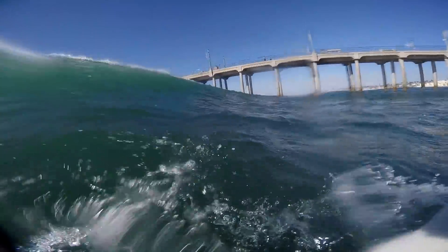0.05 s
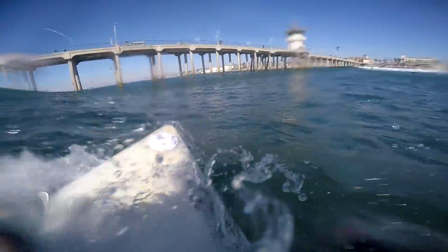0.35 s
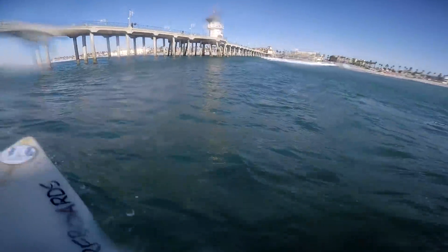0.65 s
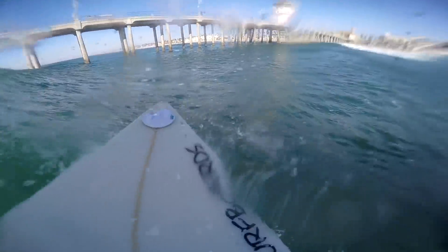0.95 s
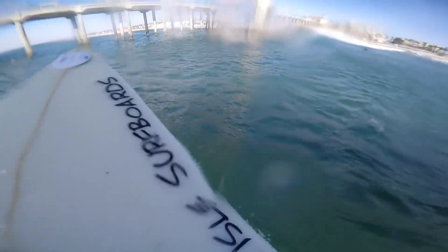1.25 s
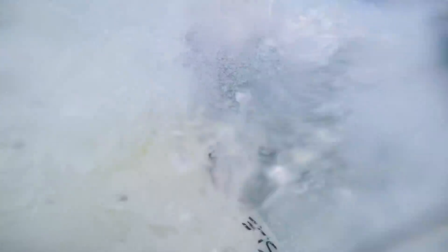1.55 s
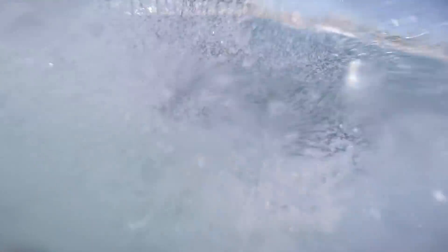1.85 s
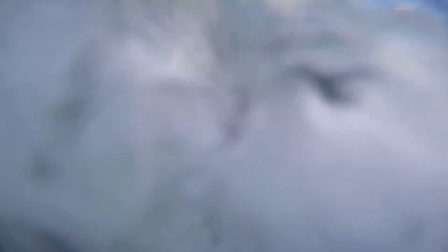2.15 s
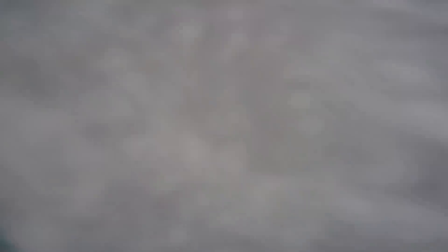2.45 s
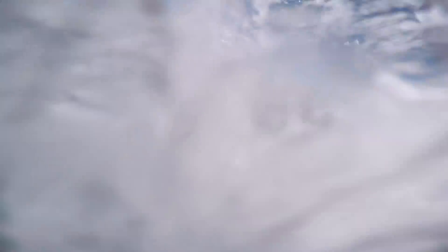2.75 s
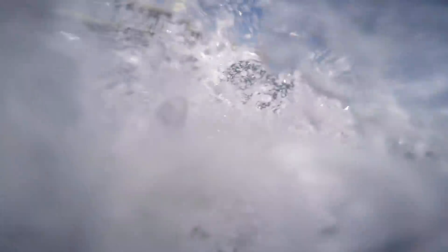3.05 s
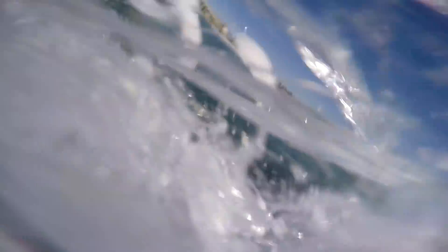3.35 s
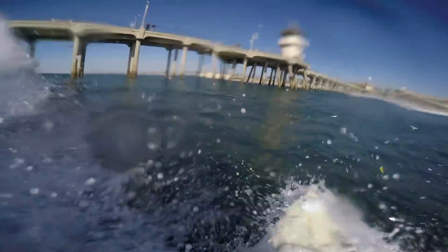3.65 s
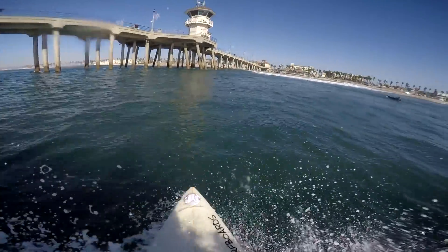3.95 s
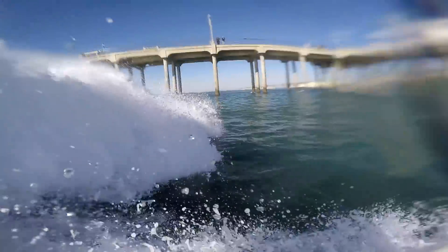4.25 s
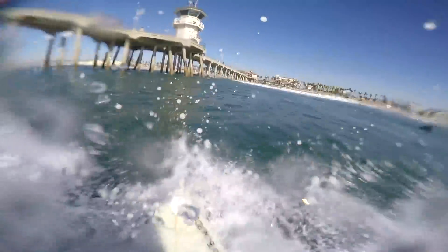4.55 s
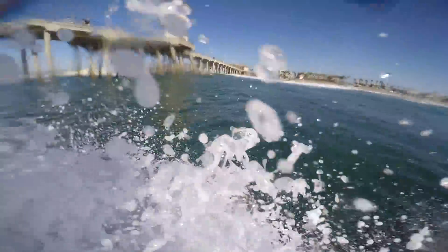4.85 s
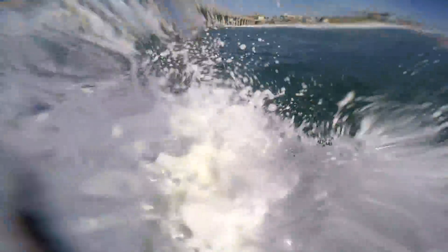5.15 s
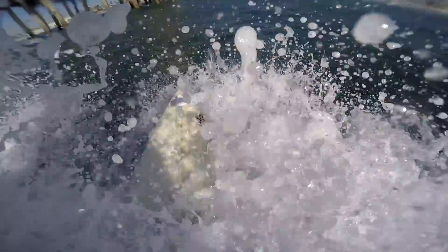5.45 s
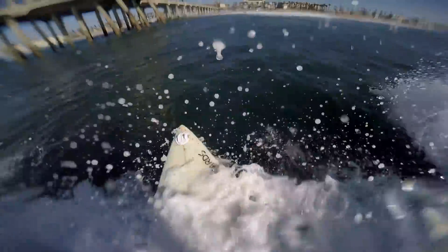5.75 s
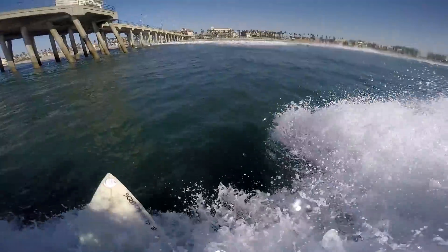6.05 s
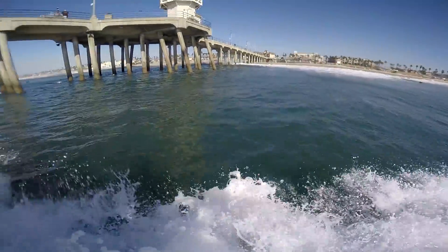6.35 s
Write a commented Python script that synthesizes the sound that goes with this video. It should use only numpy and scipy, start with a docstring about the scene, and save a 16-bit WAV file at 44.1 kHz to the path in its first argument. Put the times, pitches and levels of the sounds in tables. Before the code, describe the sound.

Sea foam seethes around a surfboard while wind rumbles low and drops pop on a waterproof case around the microphone. A wave washes over it in a loud rush of slapping water and thumps. After a brief lull, a second surge brings churning and short gulps of air. More splashes, ticks and dull knocks follow, then thin out to softer foam and wind.

```python
"""A surfer rides through breaking whitewater, heard from a waterproof camera housing.
At first wind rumbles and foam seethes, while drops pop on the case, which rings near 2.3 kHz.
Near 2 s the wave washes over it and sheets of water slap it in the loudest rush of the ride.
From 2.6 to 3.7 s it dips again, deeper; air pockets gulp and the board starts to plane.
Then more drops, slaps and thumps strike the case, thinning out after 5.5 s to foam and wind."""
import sys
import numpy as np
from scipy import signal
from scipy.fft import rfft, irfft
from scipy.io import wavfile
from scipy.ndimage import uniform_filter1d

SR = 44100
rng = np.random.default_rng(int(sys.argv[2]) if len(sys.argv) > 2 else 0)


def store_pcm(level_fs):
    """Save levels as 16-bit WAV."""
    pcm = np.round(np.clip(level_fs, -1, 1) * 32767).astype(np.int16)
    wavfile.write(sys.argv[1], SR, np.atleast_2d(pcm).T)


N = 291060
TIME = np.arange(N) / SR
BAND_LIMIT_HZ = 15550


def amp(db):
    """Amplitude ratio: a factor of ten for every 20 dB."""
    return 10 ** (np.asarray(db) / 20)


def unit(x):
    """Normalisation to an rms of 1."""
    return x / np.sqrt(np.mean(x ** 2) + 1e-20)


def spectrum(points, hz):
    """Spectral envelope in dB, interpolated over log frequency."""
    point_hz, db = np.transpose(points)
    return np.interp(np.log(hz + 1), np.log(point_hz), db)


def colour(x, points):
    """Minimum-phase filtering with the given spectral envelope, scaled to unit energy."""
    log_gain = np.log(amp(spectrum(points, abs(np.fft.fftfreq(4096, 1 / SR)))))
    response = np.exp(np.conj(signal.hilbert(log_gain)))
    taps = np.fft.ifft(response).real[:2048]
    return signal.oaconvolve(x, taps / np.linalg.norm(taps))[:N]


def add(mix, start_s, sound):
    """Superposition: a sound joins the mix at start_s."""
    part = mix[max(round(start_s * SR), 0):][:len(sound)]
    part += sound[:len(part)]


def wander(cutoff_hz):
    """Random modulation: low-passed noise of rms 1."""
    hz = np.fft.rfftfreq(N, 1 / SR)
    return unit(irfft(rfft(rng.standard_normal(N)) / (1 + (hz / cutoff_hz) ** 4), N))


def bubble(hz, swell_s):
    """Bubble resonance: trapped air acts as a spring; its swing swells, then dies away."""
    t = np.arange(SR // 60) / SR
    envelope = (t / swell_s * np.exp(1 - t / swell_s)) ** 2
    return envelope * np.sin(2 * np.pi * hz * t)


def impacts(per_s, spread_db):
    """Shot noise: independent impulses of either sign, many small and a few large."""
    pulses = np.zeros(N)
    at = np.flatnonzero(rng.random(N) < per_s / SR)
    size = np.minimum(rng.standard_exponential(N)[at], 4.5)
    pulses[at] = amp(spread_db * size) * np.sign(rng.random(N)[at] - .5)
    return pulses


def seethe(per_s, spread_db, swell_cycles, sizes=18):
    """Incoherent summation: tiny bubbles of many sizes add up to an even spectrum."""
    pulses = impacts(per_s, spread_db)
    size_class = rng.integers(0, sizes, N)
    cloud = np.zeros(N)
    for k, hz in enumerate(np.geomspace(900, 14500, sizes)):
        ring = bubble(hz, swell_cycles / hz)
        ring = ring / np.linalg.norm(ring) * np.sqrt(hz)
        cloud += signal.oaconvolve(pulses * (size_class == k), ring)[:N]
    return unit(cloud)


# Spectrum of the eddies: frequency_hz, gain_db
EDDY_SPECTRUM = [(6, -22.5), (14, -1), (20, -2), (30, -10), (50, -22), (80, -27.5), (130, -50), (300, -76)]
# Airflow over the housing, weaker while the wave shelters it: time_s, level_db
WIND_LEVELS = [(0, -22), (.3, -22), (1.38, -20.5), (1.51, -37), (1.88, -31.5), (2.12, -20), (2.41, -25),
               (2.55, -32.5), (2.88, -34), (2.95, -28), (3.3, -28), (3.6, -27), (5.45, -22), (5.75, -25),
               (6.6, -25)]


def wind(gain_db=-1, evenness=0.37, cutoff_hz=75, gust_db=2.5, gust_hz=6):
    """Vortex shedding: eddies leave the housing in quick gusts, a very low rumble."""
    hz = np.fft.rfftfreq(N, 1 / SR)
    response = amp(spectrum(EDDY_SPECTRUM, hz)) / (1 + (hz / cutoff_hz) ** 4)
    eddies = unit(irfft(rfft(rng.standard_normal(N)) * response, N))
    envelope = uniform_filter1d(abs(signal.hilbert(eddies)), size=2600)
    flow_db = np.interp(TIME, *np.transpose(WIND_LEVELS))
    return unit(eddies / envelope ** evenness) * amp(flow_db + gain_db + gust_db * wander(gust_hz))


# Strength of the whitewater: time_s, level_db
RUSH_LEVELS = [(0, -45), (.25, -48.5), (.9, -46.5), (1.48, -41.5), (1.75, -47), (1.91, -43), (2.07, -31.5),
               (2.2, -36.5), (2.37, -29.5), (2.65, -53), (2.82, -47.5), (3.0, -37.5), (3.12, -42),
               (3.28, -34.5), (3.57, -37.5), (3.7, -49.5), (3.98, -50.5), (4.25, -43.5), (4.55, -43.5),
               (4.85, -37.5), (5.1, -42.5), (5.48, -40.5), (5.7, -50), (6.6, -45)]


def rush_db():
    """Common modulation: churn, foam, spray and spatter all follow this one level."""
    return np.interp(TIME, *np.transpose(RUSH_LEVELS))


def planing(start_s=3.03, ramp_s=0.17):
    """Hydrodynamic lift: 0 while the board is slow, 1 once it planes and throws more water."""
    return np.clip((TIME - start_s) / ramp_s, 0, 1)


# Dips into the wave: start_s, end_s, immersion_fraction
WAVE_DIPS = [(1.866, 2.158, 0.51), (2.576, 3.677, 0.637)]


def immersion(awash=0.2, ramp_s=0.15):
    """Immersion from 0 (air) to 1 (water): the housing is always awash, and deeper in each dip."""
    depth = np.full(N, awash)
    for start_s, end_s, fraction in WAVE_DIPS:
        inside_s = np.minimum(TIME - start_s, end_s - TIME)
        depth += (fraction - awash) * np.clip(.5 + inside_s / ramp_s, 0, 1)
    return depth


# Spectrum of water pressing on the housing: frequency_hz, gain_db
CHURN_SPECTRUM = [(50, -7.5), (100, 3), (150, 0), (220, -3), (380, -6), (600, -12), (900, -20), (1600, -58)]


def churn(gain_db=-11, planing_db=4.5, lumpy_db=2.0):
    """Turbulent pressure fluctuation: water pushes on the housing in dull lumps."""
    pressure = rng.standard_normal(N) * amp(lumpy_db * wander(84))
    return unit(colour(pressure, CHURN_SPECTRUM)) * amp(rush_db() + gain_db + planing_db * planing())


# Low thumps on the case; the one at 1.35 s has a higher, overloaded edge: centre_s, peak_db, pitch_hz
CASE_THUMPS = [(1.351, -6.5, 42), (1.35, -24.5, 149), (2.387, -10, 62), (2.404, -14.5, 40),
               (2.949, -22.5, 35.7), (3.41, -13.5, 60), (3.44, -17, 50), (3.579, -14, 42.5),
               (4.167, -15, 34), (4.772, -21.5, 75), (4.926, -12, 101), (5.016, -16, 26.5),
               (5.402, -15.5, 45)]


def thumps(width_cycles=0.42):
    """Pressure transient: one short, low swing under a Gaussian envelope is heard as a thump."""
    pressure = np.zeros(N)
    t = np.arange(-SR // 10, SR // 10) / SR
    for centre_s, peak_db, hz in CASE_THUMPS:
        envelope = amp(peak_db) * np.exp(-.5 * (t * hz / width_cycles) ** 2)
        add(pressure, centre_s + t[0], -envelope * np.cos(2 * np.pi * hz * t))
    return pressure


# Gulping pockets of air: start_s, end_s, level_db, start_hz, middle_hz, end_hz
AIR_POCKETS = [(3.175, 3.255, -41, 206, 225, 49), (3.255, 3.36, -44.5, 177, 205, 100),
               (3.2, 3.255, -47, 383, 410, 500)]


def gulps(roughness=0.21):
    """Cavity resonance: a large air pocket hums at a pitch that bends as its neck opens and closes."""
    hums = np.zeros(N)
    for start_s, end_s, level_db, *bend_hz in AIR_POCKETS:
        progress = np.linspace(0, 1, round((end_s - start_s) * SR))
        hz = np.polyval(np.polyfit([0, .4, 1], bend_hz, 2), progress)
        tone = np.sin(2 * np.pi * np.cumsum(hz) / SR)
        add(hums, start_s, amp(level_db) * unit(np.sin(np.pi * progress) * tone))
    return hums * (1 + roughness * wander(82))


# Bands of hiss from jets and slaps: start_s, end_s, level_db, centre_hz, width_hz
HISS_BANDS = [(-.05, 0.194, -52.5, 5560, 900), (-.05, 0.2, -49.5, 1500, 540),
              (2.369, 2.409, -22.5, 2140, 1990), (2.455, 2.506, -26.5, 2420, 1630),
              (2.546, 2.587, -32, 2290, 1590), (3.245, 3.343, -36, 5370, 1700),
              (3.25, 3.32, -37, 2880, 600), (3.393, 3.42, -24, 2680, 2200), (4.114, 4.146, -38, 1100, 800),
              (4.118, 4.149, -37.5, 2030, 810)]


def hiss_bands(taper=0.46):
    """Band-limited noise: narrow bands are sizzling jets, broad ones dull slaps of water on the case."""
    hiss = np.zeros(N)
    for start_s, end_s, level_db, centre_hz, width_hz in HISS_BANDS:
        size = round((end_s - max(start_s, 0)) * SR)
        detuning = (np.fft.rfftfreq(size, 1 / SR) - centre_hz) / (width_hz / 2)
        band = irfft(rfft(rng.standard_normal(size)) / (1 + detuning ** 2), size)
        fade = signal.windows.tukey(round((end_s - start_s) * SR), taper)[-size:]
        add(hiss, start_s, amp(level_db) * unit(band) * fade)
    return hiss


def foam_clumps(hiss, spread_db=1.5):
    """Band-wise modulation: clumps of foam come and go, so each pitch region swells on its own."""
    bands = signal.stft(hiss, nperseg=512)[2]
    clumps = uniform_filter1d(rng.standard_normal(bands.shape), size=5, axis=0)  # across frequency
    clumps = uniform_filter1d(clumps, size=7, axis=1)  # across time
    return signal.istft(bands * amp(spread_db * unit(clumps)), nperseg=512)[1][:N]


# Spectra of the foam and of the brighter spray: frequency_hz, gain_db
FOAM_SPECTRUM = [(350, -11.5), (600, -9), (770, -14.5), (946, -14.5), (1120, -9.5), (1210, -5), (1560, -4),
                 (1680, -2), (2230, 2), (2950, -0.5), (3400, -9), (4040, -8.5), (4500, -10), (5590, -20.5),
                 (8000, -36), (10400, -37), (17600, -120)]
SPRAY_SPECTRUM = [(2800, -10), (3800, -7.5), (5000, -0.5), (5900, -4), (6800, -4.5), (8500, -12),
                  (11000, -14.5), (13000, -14.5), (15200, -22), (15800, -31)]


def whitewater(spray_db=-9.0, planing_db=1.5, immersed_db=-0.5, surge_db=1.5):
    """Bubble noise: in air countless far bubbles merge to a hiss; under water near ones stand apart."""
    depth = immersion()
    far, near = np.sqrt(1 - depth), np.sqrt(depth)  # equal-power crossfade
    flutter_db = (0.8 + 2 * depth) * wander(41)
    foam = far * rng.standard_normal(N) + near * seethe(per_s=1500, spread_db=4.0, swell_cycles=1.8)
    spray = far * rng.standard_normal(N) + near * seethe(per_s=1400, spread_db=4.6, swell_cycles=1.8)
    spray_gain = amp(spray_db + planing_db * planing() + immersed_db * depth)
    hiss = unit(colour(foam, FOAM_SPECTRUM)) + spray_gain * unit(colour(spray, SPRAY_SPECTRUM))
    return foam_clumps(hiss) * amp(rush_db() + flutter_db + surge_db * wander(6))


# Spectrum of fine droplets and mist: frequency_hz, gain_db
MIST_SPECTRUM = [(600, -43), (1400, -19), (2500, -2), (5000, 4), (8000, -5), (11000, -8), (15000, -12),
                 (16500, -18)]


def spatter(tick_db=-20, pop_db=-15):
    """Impact noise: droplets tick and pop on the case, louder as it dips into the spray."""
    ticks = unit(colour(impacts(per_s=140, spread_db=7.5), MIST_SPECTRUM))
    pops = unit(colour(seethe(per_s=130, spread_db=2.1, swell_cycles=1.3), MIST_SPECTRUM))
    wetness = np.clip(2 * immersion(), .25, 1)
    return wetness * amp(rush_db()) * (amp(tick_db) * ticks + amp(pop_db) * pops)


# Response of the case to a splash: frequency_hz, gain_db
CASE_SPECTRUM = [(200, -4), (800, -10.5), (1300, -2.5), (1900, 2), (2600, 5), (3200, -4), (4000, 0.5),
                 (5200, -5.5), (6800, -7), (8500, -14), (11500, -17.5), (15000, -18), (16500, -66)]
# Sheets of water hitting the case: start_s, length_s, splash_db, churn_db
WATER_SHEETS = [(0.436, 0.0069, -33, -53), (1.325, 0.025, -41.5, -51), (1.476, 0.0037, -28.5, -63),
                (1.692, 0.0034, -33, -55), (1.959, 0.016, -29, -63), (2.027, 0.0099, -28.5, -30.5),
                (2.071, 0.013, -39, -34), (2.163, 0.016, -34.5, -35), (2.299, 0.024, -23, -36.5),
                (2.334, 0.028, -27, -51), (2.36, 0.033, -24, -25.5), (2.45, 0.028, -29.5, -36.5),
                (2.552, 0.055, -38.5, -52), (3.173, 0.014, -31.5, -34.5), (3.222, 0.006, -27, -30),
                (3.393, 0.014, -25.5, -22.5), (3.421, 0.025, -24.5, -29.5), (3.54, 0.012, -37.5, -36),
                (4.694, 0.0021, -22, -27.5), (4.717, 0.0022, -30, -26), (4.772, .01, -30, -37),
                (4.881, 0.0072, -31.5, -39), (4.916, 0.0089, -33, -27.5), (5.38, 0.0023, -22.5, -35),
                (5.479, 0.013, -32, -49)]


def slaps(rise_s=0.0011, fall_s=0.0046, ragged_db=2.5, hiss_db=-3):
    """Air entrainment: a sheet of water lands at once, tears into bubbles and drains off."""
    splash_envelope, push_envelope = np.zeros(N), np.zeros(N)
    t = np.arange(SR // 5) / SR
    for start_s, length_s, splash_db, churn_db in WATER_SHEETS:
        shape = (1 - np.exp(-t / rise_s)) * np.exp(-np.maximum(t - length_s, 0) / fall_s)
        add(splash_envelope, start_s, amp(splash_db) * shape)
        add(push_envelope, start_s, amp(churn_db) * shape)
    ragged = unit(amp(ragged_db * wander(190)))
    bubbles = seethe(per_s=5000, spread_db=4.9, swell_cycles=1.88)
    tearing = unit(bubbles + amp(hiss_db) * rng.standard_normal(N))
    splash = colour(tearing * splash_envelope * ragged, CASE_SPECTRUM)
    push = colour(rng.standard_normal(N) * push_envelope * ragged, CHURN_SPECTRUM)
    return splash + push


# Resonances of the housing: pitch_hz, level_db, t60_s
HOUSING_MODES = [(1836, -21.5, 0.0052), (2290, -39, 0.058), (2760, -56, 0.02), (3820, -28.5, 0.021)]


def housing_ring(excitation, gain_db=-12):
    """Modal resonance: the struck case rings on briefly as a sum of damped sinusoids."""
    t = np.arange(SR // 20) / SR
    ring = sum(amp(db - 60 * t / t60_s) * np.sin(2 * np.pi * hz * t) for hz, db, t60_s in HOUSING_MODES)
    return amp(gain_db) * signal.oaconvolve(excitation, ring)[:N]


def stray_drops(immersed_per_s=52, base_db=-29, spread_db=2.2, low_hz=2200, high_hz=8000, count=400):
    """Random arrivals: rows of lesser drops, harder in a loud rush and more frequent with depth."""
    when, chance, pitch = rng.random((count, 3)).T
    at = (when * N).astype(int)
    excess_db = rush_db()[at] + 44  # above a middling rush
    level_db = base_db + 0.49 * excess_db + spread_db * rng.standard_normal(count)
    pitch_hz = low_hz * (high_hz / low_hz) ** pitch
    swell_cycles = np.full(count, 2.0)
    per_s = immersed_per_s * immersion()[at] ** 1.9
    candidates = np.column_stack([at / SR, level_db, pitch_hz, swell_cycles])
    return list(candidates[chance < per_s * N / SR / count])


# The loudest drops bursting on the housing: start_s, level_db, pitch_hz, swell_cycles
LOUD_DROPS = [(0.2136, -23.5, 2150, 0.88), (0.4443, -19, 2540, 1.2), (0.8869, -15.5, 2860, 1.5),
              (0.887, -21.5, 10500, 2.7), (0.9016, -24, 2300, 2), (0.911, -20.5, 2560, 1.2),
              (0.948, -16.5, 2500, 1.3), (1.0823, -20, 4540, 1), (1.2031, -17.5, 5000, 0.71),
              (1.4789, -15.5, 3200, 1.2), (1.481, -25, 1780, 1.1), (1.545, -6.5, 5080, 1.33),
              (1.5679, -23, 4570, 1.2), (1.6955, -16.5, 5000, 1.5), (1.6966, -16.5, 2780, 0.95),
              (1.891, -22, 7800, 1.3), (2.0059, -10, 4470, 0.6), (2.077, -16, 2600, 3.5),
              (2.1234, -5.5, 5000, 0.94), (2.1687, -9.5, 4000, 1.05), (2.17, -19.5, 11100, 3.1),
              (2.21, -19, 3100, 1.6), (2.31, -11, 3880, 1.5), (2.7788, -28, 6800, 1.4),
              (2.876, -25.5, 4910, 2.1), (2.945, -24, 5360, 2.8), (2.9691, -18.5, 2030, 0.79),
              (2.978, -18, 4930, 3.3), (3.034, -20, 2420, 0.68), (3.0655, -18.5, 5860, 2),
              (3.0783, -13.5, 5450, 1.1), (3.1745, -9.5, 1850, 2), (3.1884, -17, 1750, 0.51),
              (3.2257, -18.5, 5400, 1.8), (3.3484, -16.5, 4020, 1.8), (3.4783, -13.5, 3480, 0.79),
              (3.4905, -17, 2400, 1.1), (3.4992, -14, 6350, 0.92), (3.5412, -20.5, 2030, 0.6),
              (3.5671, -14.5, 5630, 1.1), (4.1509, -15.5, 2500, 1.8), (4.231, -15, 2540, 1.15),
              (4.4988, -15.5, 11500, 0.54), (4.5133, -17, 4300, 0.8), (4.694, -23, 1940, 1.5),
              (4.7199, -6.5, 1890, 0.57), (4.7744, -20, 2190, 0.59), (4.8803, -17.5, 1950, 0.51),
              (4.92, -16.5, 1610, 0.62), (4.978, -11, 5300, 2.1), (5.1927, -15.5, 2450, 2.2),
              (5.2092, -21.5, 5240, 3.3), (5.2217, -13.5, 7020, 2.9), (5.3132, -15, 2740, 0.96),
              (5.3312, -18, 3250, 0.81), (5.3793, -16.5, 5320, 3), (5.3801, -19, 12500, 1.8),
              (5.4257, -17.5, 2260, 0.51), (5.4628, -13, 3220, 0.65), (5.484, -17, 2960, 2.3),
              (5.5149, -19, 2390, 1.5), (6.0354, -24.5, 1910, 0.76)]


def drops(linger_db=-17, small_ratio=1.93, small_db=-11.5, small_cycles=1.05,
          knock_hz=2300, knock_db=-13, knock_s=0.00055, mist_db=-24, mist_s=0.00073):
    """Impact and bubble resonance: each drop knocks on the case, traps two bubbles and bursts to mist."""
    pops, mist_envelope = np.zeros(N), np.zeros(N)
    t = np.arange(SR // 20) / SR
    puff = t / mist_s * np.exp(1 - t / mist_s)
    for start_s, level_db, hz, swell_cycles in LOUD_DROPS + stray_drops():
        large = bubble(hz, swell_cycles / hz)
        tail = bubble(hz, 3 * swell_cycles / hz)  # at a small swing the bubble loses less and lingers
        small_hz = min(hz * small_ratio, BAND_LIMIT_HZ)
        small = bubble(small_hz, small_cycles / small_hz)
        knock = bubble(knock_hz, knock_s)
        add(pops, start_s, amp(level_db) * (large + amp(linger_db) * tail + amp(knock_db) * knock))
        add(pops, start_s + knock_s, amp(level_db + small_db) * small)
        add(mist_envelope, start_s, amp(level_db + mist_db) * puff)
    direct = pops + colour(mist_envelope * rng.standard_normal(N), MIST_SPECTRUM)
    return direct + housing_ring(direct)


def scene():
    """Superposition: the pressures of water and wind add at one microphone."""
    water = whitewater() + spatter() + churn() + slaps() + drops() + hiss_bands() + gulps()
    return (water + wind() + thumps())[None]


def record(dry, ceiling=0.42):
    """Soft saturation rounds off the loudest peaks; a low-pass filter then limits the band."""
    limited = dry / (1 + (dry / ceiling) ** 6) ** (1 / 6)
    low_pass = signal.firwin(301, BAND_LIMIT_HZ, window=("kaiser", 9), fs=SR)
    return signal.oaconvolve(limited, low_pass[None], "same")


dry = scene()
out = record(dry)
store_pcm(out)
```